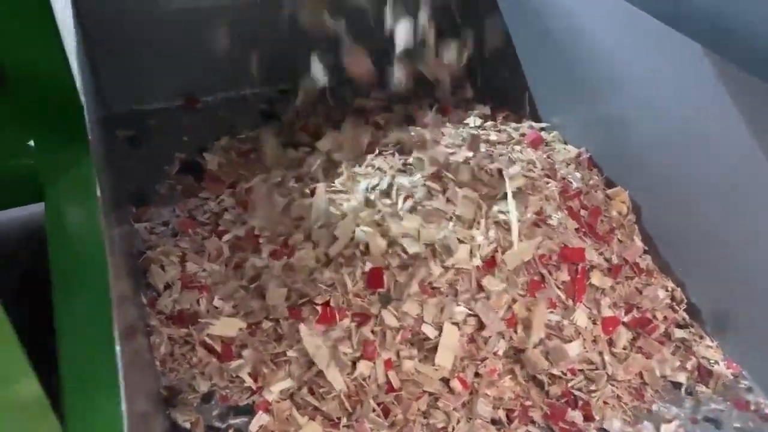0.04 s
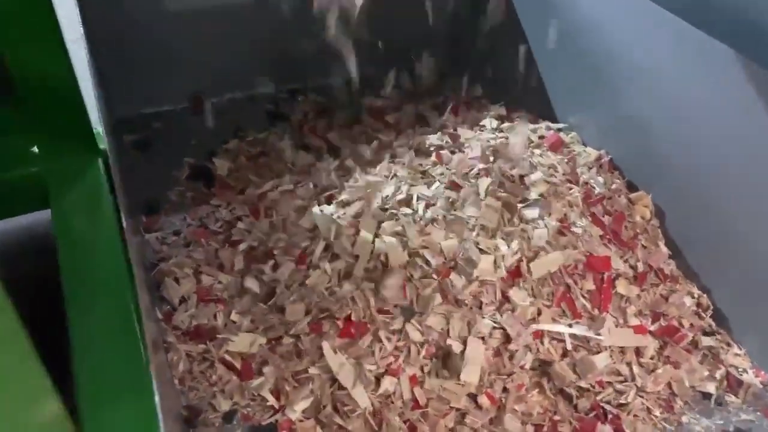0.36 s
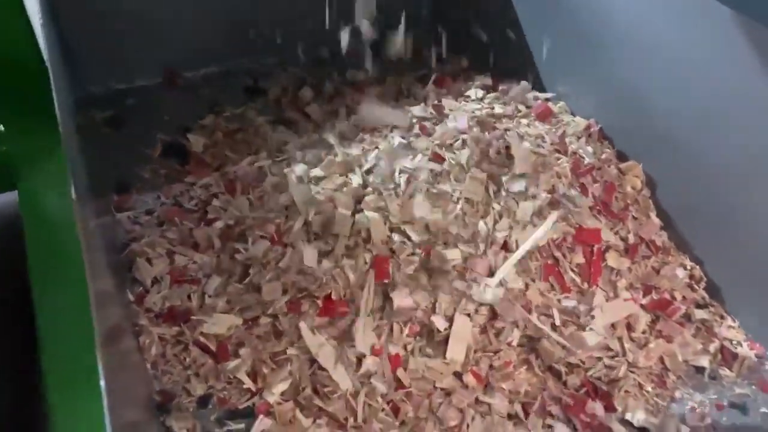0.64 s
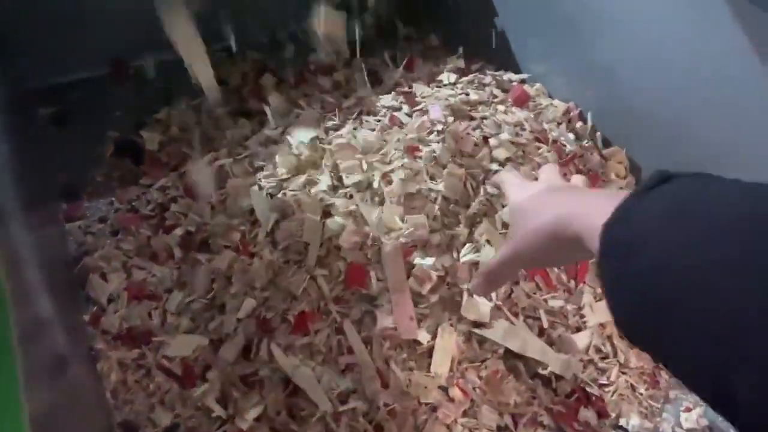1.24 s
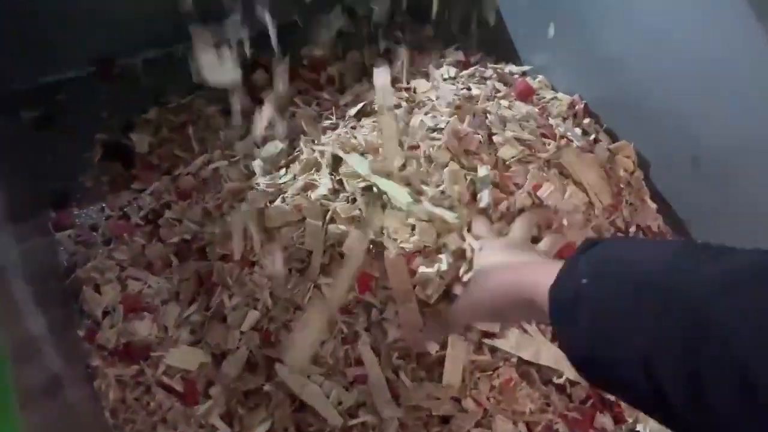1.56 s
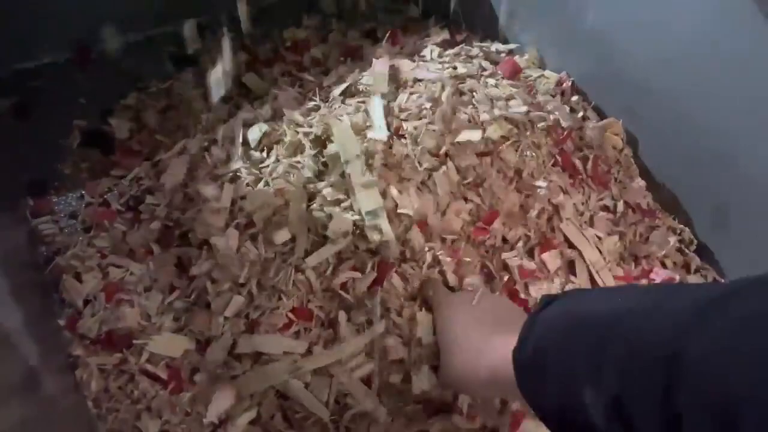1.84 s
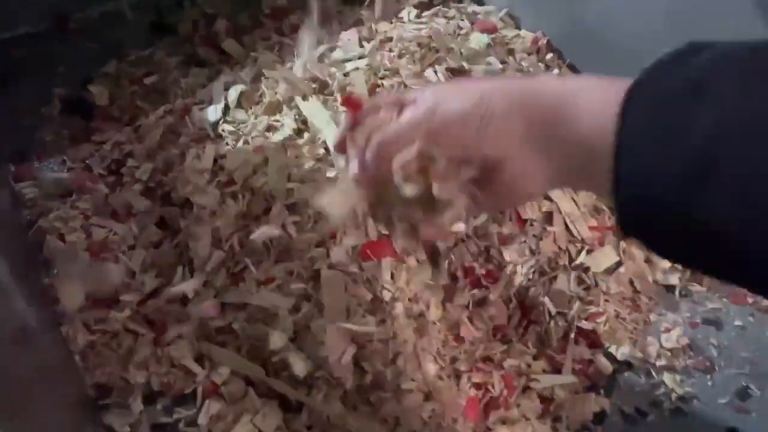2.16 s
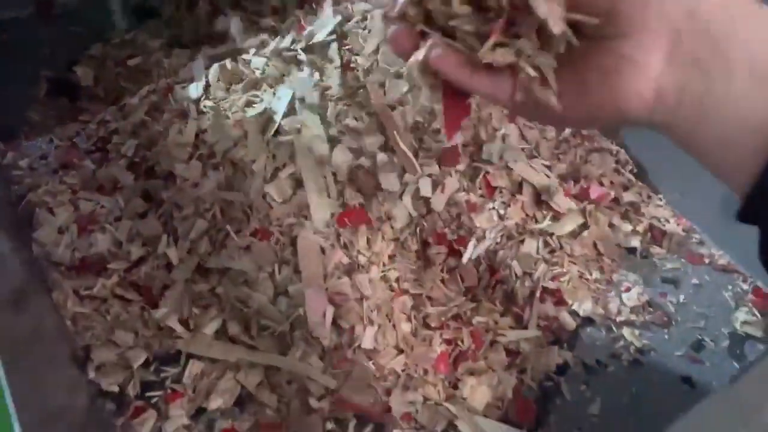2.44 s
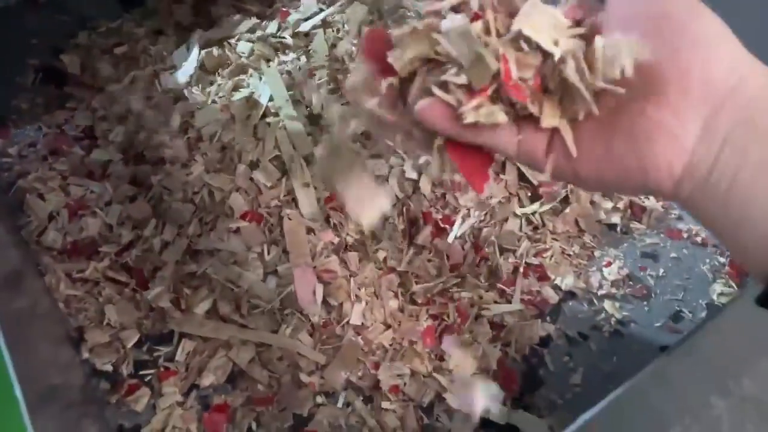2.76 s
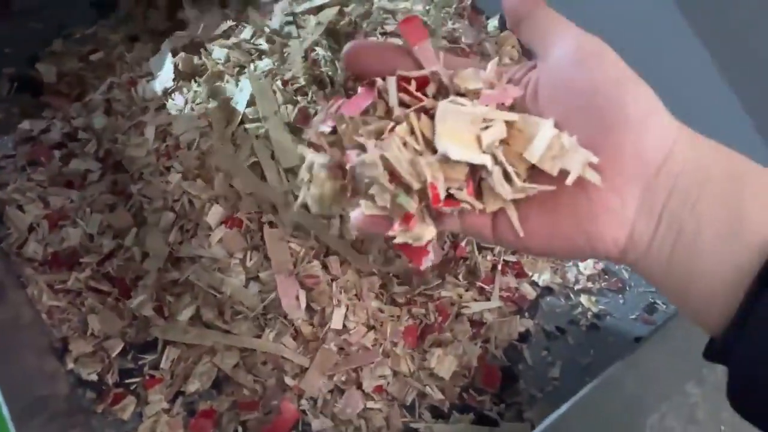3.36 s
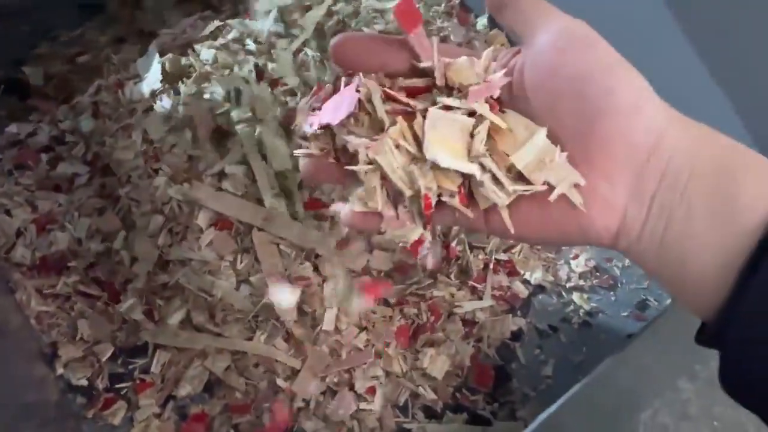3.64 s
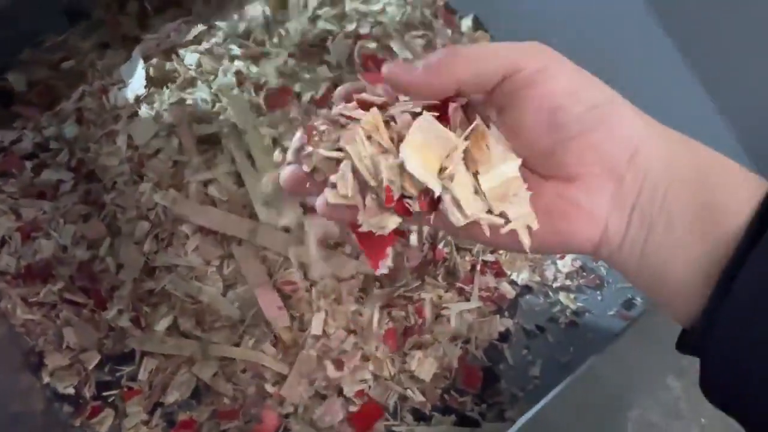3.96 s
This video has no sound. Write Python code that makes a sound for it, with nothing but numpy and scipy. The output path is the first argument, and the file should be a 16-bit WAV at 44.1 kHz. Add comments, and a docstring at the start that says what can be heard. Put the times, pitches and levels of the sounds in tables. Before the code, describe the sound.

Heard from just above its metal chip bin in a workshop, a wood shredder hums, whines and roars throughout. Chips patter onto the heap, short crunches keep coming, big splinters clack now and then, and the rumble eases slightly later.

```python
"""A wood shredder in a workshop, heard in stereo from just above its metal chip bin. From the start the rotor
hums, the motor whines in clusters of thin lines, the housing rumbles, air and dust roar round the cutters and
chips patter onto the heap. Almost at once the cutters begin to crunch wood in short bursts; from 0.28 s large
splinters, and once a dropped chip, clack now and then on casing and heap. The rumble eases in the second half;
the bursts go on to the end at 4 s."""
import sys
import numpy as np
from scipy import signal
from scipy.fft import rfft, irfft
from scipy.io import wavfile

SR = 44100
rng = np.random.default_rng(int(sys.argv[2]) if len(sys.argv) > 2 else 0)


def materialize(psi):
    """Save the field psi as 16-bit PCM at rate SR to the path in sys.argv[1].

    A 1-D psi becomes a single channel; in a 2-D psi each row is a channel.
    """
    bounded = np.clip(np.atleast_2d(psi).T, -1, 1)
    quanta = np.round(bounded * 32767).astype(np.int16)
    wavfile.write(sys.argv[1], SR, quanta)


N = 176400
T, HZ = np.arange(N) / SR, np.fft.rfftfreq(N, 1 / SR)

# cutter passing rate: t/s, f/Hz
PASS_RATE = [(0, 108), (.4, 106.9), (.75, 107.2), (2.35, 108.6), (3.1, 107)]
# hum partials 1, 2, 3, 4, 6: t/s, level/dB
HUM_1 = [(0, -58), (.55, -27), (.68, -22), (.85, -39), (1.18, -20.5), (1.3, -32), (1.55, -30), (1.9, -31),
         (2.15, -28.5), (3.5, -34), (3.9, -26.5)]
HUM_2 = [(1.3, -40.5), (1.53, -28), (1.9, -42.5)]
HUM_3 = [(0, -26), (.47, -34), (.59, -20), (.78, -28), (1.05, -29), (1.33, -28), (1.45, -25.5),
         (2.5, -23.5), (2.75, -30), (3.1, -24), (3.36, -36), (4, -29.5)]
HUM_4 = [(0, -16), (.09, -17), (.21, -34), (.32, -25), (.47, -36.5), (.54, -16), (.67, -20), (.8, -16),
         (.88, -27), (1.02, -21), (1.11, -36), (1.27, -32), (1.38, -17.5), (1.57, -15), (1.7, -24),
         (1.79, -18), (1.85, -25), (2.09, -21.5), (2.2, -43), (2.28, -14.5), (2.42, -34), (2.5, -23),
         (3.0, -23), (3.37, -33.5), (3.5, -26), (3.78, -26), (3.92, -21.5), (4, -25)]
HUM_6 = [(0, -33), (.9, -43), (1.55, -32.5), (1.95, -37), (2.25, -35.5), (2.8, -41), (3.3, -49)]

# motor line groups: mains multiple, level/dB
WHINE = [(53, -49.5), (70, -56.5), (90, -54.5), (115, -53), (129, -55.5)]
LOW_SQUEAL = [(37, -49.5), (39, -44.5), (41, -54), (43, -49.5)]
MID_SQUEAL = [(76, -43.5)]
HIGH_SQUEAL = [(86, -47.5)]
RASP = [(74, -51), (75, -45.5), (78, -44)]
WHISTLE = [(84, -45.5)]
# their swell as the load shifts: t/s, gain/dB
LOW_SQUEAL_GAIN = [(1.7, -3), (2.05, 3.5), (2.35, 2), (2.9, -8.5)]
MID_SQUEAL_GAIN = [(.62, -10), (.85, 2), (1.3, -.5), (1.8, 3.5), (2.2, -2), (2.7, 1.5), (4, -6)]
HIGH_SQUEAL_GAIN = [(.1, 5), (.35, -11), (1.0, 2), (1.45, -8), (1.62, 6.5), (2.1, -5), (2.45, 3),
                    (2.65, -10)]
RASP_GAIN = [(1.1, -11), (1.65, 2.5), (1.95, -6), (2.2, -9)]
WHISTLE_GAIN = [(.1, -10), (.24, 7), (.4, -8), (.8, -4), (1.4, -7), (3.4, -0.5), (3.6, 3), (4, -1)]

# housing rumble: f/Hz, density/(dB per Hz)
RUMBLE_SPECTRUM = [(15, -84), (35, -66), (55, -59.5), (90, -51), (180, -48.5), (260, -51), (370, -49),
                   (460, -53), (520, -57.5), (750, -57.5), (1000, -71.5), (2000, -91), (8000, -110)]
# housing resonances: f/Hz, width/Hz, lift/dB
HOUSING_MODES = [(105, 21, 6.5), (138, 24, 4), (467, 29, 3)]
# swell of rumble and hum partial 5: t/s, gain/dB
RUMBLE_GAIN = [(0, 1), (.7, 1), (1.6, 0.5), (2.9, -2), (4, -3)]
# deepest rumble, bin wall boom: t/s, level/dB
DEEP_LEVEL = [(0, -48), (.6, -37), (2.4, -38.5), (3.3, -28.5), (3.7, -37), (4, -27.5)]
BOOM_LEVEL = [(0, -21), (.22, -22), (.5, -32), (1.7, -31)]

# chamber roar: f/Hz, density/(dB per Hz)
ROAR_SPECTRUM = [(200, -98), (700, -75.5), (1050, -64.5), (1400, -69.5), (1900, -66.5), (3000, -73),
                 (5000, -75), (7000, -77), (9500, -77), (12000, -82.5), (13700, -90.5)]
# its swell: t/s, gain/dB
ROAR_GAIN = [(0, 5), (.3, 1.5), (1.0, -0.5), (1.45, 0), (1.7, 2), (1.88, 0), (2.1, 0.5), (2.3, 4.5),
             (2.55, -1), (2.7, 4), (2.85, -.5), (3.2, 3.5), (3.7, -0.5), (4, 3)]
# colour of falling chips, before a treble tilt: f/Hz, level/dB
CHIP_COLOUR = [(300, -104), (1000, -71), (2200, -73), (4000, -75.5), (7000, -84), (9500, -83), (12000, -90)]

# cutter bites: t/s, length/s, crunch gain/dB, hiss gain/dB
BITES = [(0.034, 0.0092, -2, 0), (0.12, 0.039, -3, -12), (0.272, 0.029, -3, 3), (0.341, 0.014, -1.5, 0),
         (0.417, 0.0058, -9, 3), (0.553, 0.032, 0, -3), (0.771, 0.038, -2.5, 1), (0.827, 0.019, -17, 0.5),
         (0.93, 0.043, -5, 0), (1.579, 0.025, -4, -2), (1.638, 0.015, -1.5, 0), (1.752, 0.04, -15, -2),
         (1.919, 0.016, -1.5, -5), (2.233, 0.034, -2, -4), (2.331, 0.062, -1.5, -15),
         (2.451, 0.052, -0.5, -2), (2.596, 0.047, 1, -3), (2.669, 0.01, 2, -10), (2.94, 0.022, -9, -0.5),
         (3.397, 0.026, 0.5, -2), (3.538, 0.037, -3, -2), (3.949, 0.024, -0.5, -10)]
# crunch and splinter hiss at 0 dB gain: f/Hz, density/(dB per Hz)
CRUNCH_SPECTRUM = [(150, -135), (500, -54.5), (1000, -64.5), (2400, -65), (4000, -65), (7000, -74.5),
                   (15000, -90)]
HISS_SPECTRUM = [(1000, -90), (4000, -76.5), (7000, -73.5), (10000, -73), (12500, -79.5), (15700, -87)]
# large splinters striking, and one dropped chip at 3.15 s: t/s, f/Hz, level/dB
KNOCKS = [(0.277, 694, -17), (.295, 615, -16), (.423, 2780, -30), (1.639, 2620, -23), (2.468, 950, -24.5),
          (2.667, 2570, -19), (2.673, 850, -20), (2.678, 940, -21.5), (3.148, 950, -29), (3.555, 1000, -24)]

# stereo image: f/Hz, left/right coherence, right lead/rad, left minus right/dB
STEREO_IMAGE = [(140, .96, -.15, -2.5), (440, .86, -1.1, -1.1), (750, .3, -1.5, 3), (1400, .2, .5, 1.5),
                (2500, .4, -.5, 2.5), (5200, .42, -.5, 3), (6800, .62, 1, 1), (7800, .99, 3, 0),
                (8700, .99, 3.25, 0), (9700, .65, 4.5, 0), (11600, .8, 6.3, 0), (13200, .5, 7.7, 0),
                (14100, .99, 9.4, 0)]


def amp(db):
    """dB to gain."""
    return 10 ** (np.asarray(db) / 20)


def unit(x):
    """Scale to rms 1."""
    return x / np.sqrt(np.mean(x ** 2) + 1e-20)


def curve(points):
    """Time table at every sample."""
    return np.interp(T, *np.transpose(points))


def over_hz(points, column=1):
    """Table column over log frequency."""
    table = np.transpose(points)
    return np.interp(np.log(HZ + 1), np.log(table[0] + 1), table[column])


def drift(rate_hz):
    """Slow random curve, rms about 1."""
    count = 512
    hz = np.fft.rfftfreq(count, N / SR / count)
    slow = irfft(rfft(rng.standard_normal(count)) * (hz > 0) / np.sqrt(1 + (hz / rate_hz) ** 4))
    return np.interp(T, np.linspace(0, N / SR, count), unit(slow))


def flutter(rate_hz):
    """Complex drift: shakes a tone's level and phase."""
    return drift(rate_hz) + 1j * drift(rate_hz)


def colour(x, db):
    """Give white sound of rms 1 a spectrum in dB per Hz."""
    return irfft(rfft(x) * amp(db) * np.sqrt(SR / 2), N)


def noise(db):
    """Two independent coloured noises."""
    return colour(rng.standard_normal((2, N)), db)


def clicks(per_s, spread_db):
    """Two random click trains, a few clicks large."""
    size = amp(spread_db * np.minimum(rng.exponential(1, (2, N)), 4.5))
    return size * rng.choice([-1, 1], (2, N)) * (rng.random((2, N)) < per_s / SR)


def stereo(pair):
    """Blend two independent signals to left/right; nearly opposite phase near 8 and above 14 kHz."""
    a, b = rfft(pair)
    coherence = np.clip(over_hz(STEREO_IMAGE), 0, 1)
    lead_rad = over_hz(STEREO_IMAGE, column=2)
    balance = amp(over_hz(STEREO_IMAGE, column=3) / 2)
    right = (coherence * a + np.sqrt(1 - coherence ** 2) * b) * np.exp(1j * lead_rad)
    return irfft(np.array([a * balance, right / balance]), N)


def room(x, t60_s=0.21, tail_db=-2.5):
    """Add the short tail of bin and workshop; scale to rms 1."""
    t = T[:SR // 2]
    tail = rng.standard_normal((2, len(t))) * amp(-60 * t / t60_s)
    wet = signal.fftconvolve(x, tail / np.linalg.norm(tail[0]), axes=1)[:, :N]
    return unit(x + amp(tail_db) * wet)


def rotor():
    """Partials of the cutter passing rate, each swelling alone, shaken by the uneven load."""
    pass_hz = curve(PASS_RATE) * (1 + 0.0058 * drift(31))
    phase_rad = 2 * np.pi * np.cumsum(pass_hz) / SR
    fifth_db = -40.5 + curve(RUMBLE_GAIN)
    levels_db = [curve(HUM_1), curve(HUM_2), curve(HUM_3), curve(HUM_4), fifth_db, curve(HUM_6)]
    hum = np.zeros((2, N))
    for k, db in enumerate(levels_db, 1):
        tone = np.sqrt(2) * amp(db) * np.exp(1j * (k * phase_rad + 2 * np.pi * rng.random()))
        rough = 1 + 0.21 * flutter(32)
        scatter = 0.84 * flutter(3.7)
        hum += (tone * np.array([rough, scatter])).real
    return stereo(hum)


def motor(mains_hz=50.002, waver_db=1.2, left_bias_db=4.5):
    """Magnetic whine: fluttering lines at mains multiples; close lines beat into a rasp."""
    groups = ((WHINE, 0), (LOW_SQUEAL, curve(LOW_SQUEAL_GAIN)),
              (MID_SQUEAL, curve(MID_SQUEAL_GAIN)), (RASP, curve(RASP_GAIN)),
              (WHISTLE, curve(WHISTLE_GAIN)), (HIGH_SQUEAL, curve(HIGH_SQUEAL_GAIN)))
    balance = amp(left_bias_db / 2)
    out = np.zeros((2, N))
    for lines, swell_db in groups:
        for k, db in lines:
            tone = np.exp(2j * np.pi * (k * mains_hz * T + rng.random()))
            tone *= 1 + 0.2 * flutter(35)
            tone *= np.sqrt(2) * amp(db + swell_db + waver_db * drift(4))
            lead_rad = 0.7 * drift(1)
            out += np.array([tone * balance, tone / balance * np.exp(1j * lead_rad)]).real
    return out


def housing(throb_db=1.78, deep_hz=65.7, deep_width_hz=16.6, boom_hz=146.7, boom_width_hz=9.2):
    """The shaken housing rumbles in its resonances; the bin wall booms."""
    modes_db = sum(lift / (1 + (2 * (HZ - hz) / width) ** 2) for hz, width, lift in HOUSING_MODES)
    rumble = noise(over_hz(RUMBLE_SPECTRUM) + modes_db)
    rumble *= amp(curve(RUMBLE_GAIN) + throb_db * drift(16))
    deep_band_db = -20 * np.log10(1 + ((HZ - deep_hz) / deep_width_hz) ** 4)
    deep = unit(noise(deep_band_db)) * amp(curve(DEEP_LEVEL))
    boom_gain = np.sqrt(2) * amp(curve(BOOM_LEVEL) + 2 * drift(7.2))
    wall_hz = boom_hz + boom_width_hz / 2 * drift(22)
    boom = boom_gain * np.sin(2 * np.pi * np.cumsum(wall_hz) / SR)
    return stereo(rumble + deep + np.array([boom, np.zeros(N)]))


def chamber(band_waver_db=2, flutter_db=1.2):
    """Air and wood dust roar round the cutters; half-octave bands waver independently."""
    spectrum = rfft(noise(over_hz(ROAR_SPECTRUM)))
    half_octaves = np.clip(2 * np.log2(HZ / 500 + 1e-9), 0, 10)
    roar = np.zeros((2, N))
    for band in range(11):
        weight = np.maximum(1 - abs(half_octaves - band), 0)
        roar += irfft(spectrum * weight, N) * amp(band_waver_db * drift(15.3))
    return stereo(roar * amp(curve(ROAR_GAIN) + flutter_db * drift(38)))


def chips(per_s=800, sizes=20, clump_db=2.5):
    """Chips of many sizes land in clumps, each a tick with a very short woody ring."""
    t, patter = T[:1024], np.zeros((2, N))
    for hz in np.geomspace(800, 14000, sizes):
        decay_s = 0.0018 * 2000 / hz
        ring = np.exp(-t / decay_s) * np.cos(2 * np.pi * hz * rng.uniform(.92, 1.08) * t)
        impact = ring / np.linalg.norm(ring) + 0.72 * (t == 0)
        patter += signal.oaconvolve(clicks(per_s / sizes, spread_db=2.2), impact[None], axes=1)[:, :N]
    patter *= amp(clump_db * drift(14))
    tilt_db = 10 * np.log10(HZ / 4000 + .1)  # offsets the crowding of low rings
    return stereo(colour(room(patter), over_hz(CHIP_COLOUR) + tilt_db))


def cutters(attack_s=0.003, decay_s=0.011, cracks_per_s=2200):
    """Each bite is a dense run of cracks: a crunch with splinter hiss above it."""
    crunch_gain, hiss_gain = np.zeros((2, N))
    for start_s, length_s, crunch_db, hiss_db in BITES:
        rise = np.clip((T - start_s) / attack_s, 0, 1)
        fall = np.exp(-np.clip((T - start_s - length_s) / decay_s, 0, 20))
        crunch_gain += amp(crunch_db) * rise * fall
        hiss_gain += amp(hiss_db) * rise * fall
    out = np.zeros((2, N))
    for gain, spectrum in ((crunch_gain, CRUNCH_SPECTRUM), (hiss_gain, HISS_SPECTRUM)):
        cracks = room(clicks(cracks_per_s, spread_db=1.5))
        out += colour(cracks * gain, over_hz(spectrum))
    return stereo(out)


def knocks(decay_s=0.008, half_width_hz=180):
    """Large splinters, and once a dropped chip, clack on casing and heap, each with one broad, heavily damped
    resonance."""
    out = np.zeros((2, N))
    for start_s, hz, db in KNOCKS:
        ring = unit(noise(-10 * np.log10(1 + ((HZ - hz) / half_width_hz) ** 2)))
        envelope = (T > start_s) * np.exp(-np.maximum(T - start_s, 0) / decay_s)
        out += amp(db) * ring * envelope
    return stereo(out)


def scene():
    """The machine and its falling chips."""
    return rotor() + motor() + housing() + chamber() + chips() + cutters() + knocks()


def record(dry):
    """Low-pass band limit."""
    edge_hz = 15780
    lowpass = signal.firwin(511, edge_hz, window=("kaiser", 9), fs=SR)
    return signal.oaconvolve(dry, lowpass[None], "same")


dry = scene()
out = record(dry)
materialize(out)
```